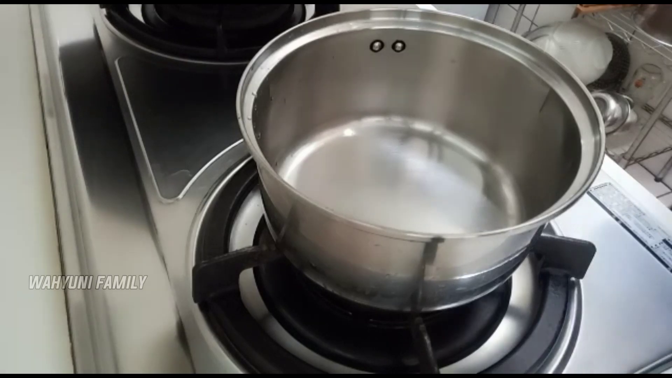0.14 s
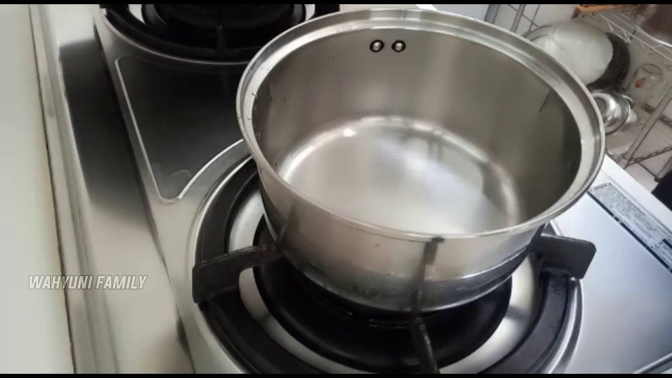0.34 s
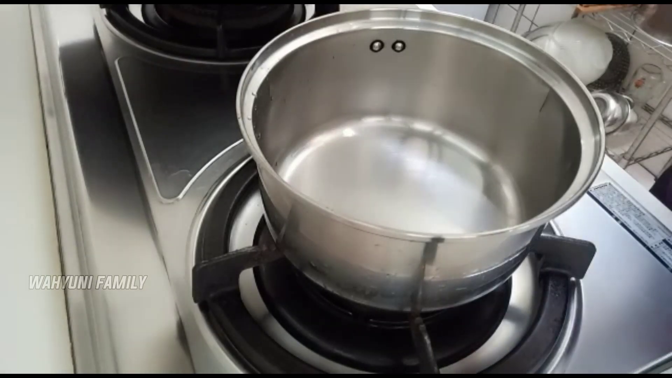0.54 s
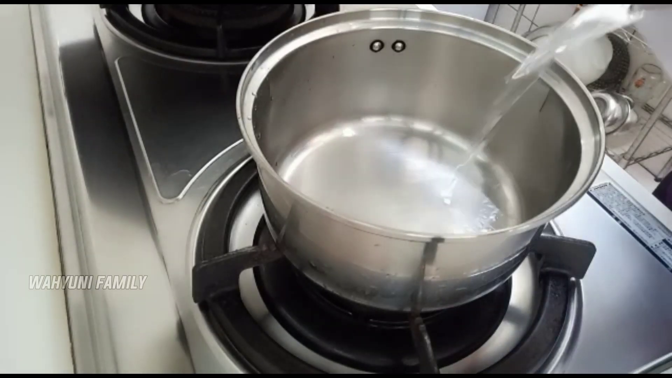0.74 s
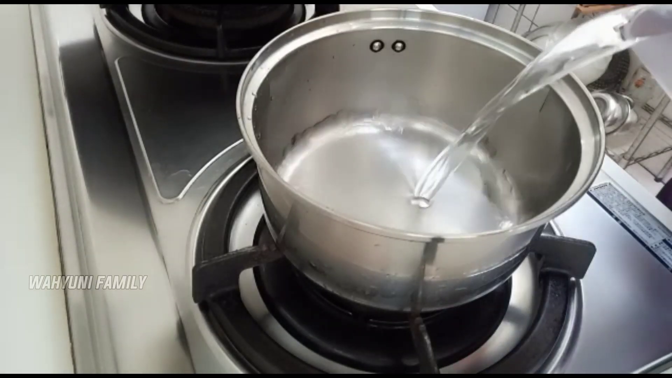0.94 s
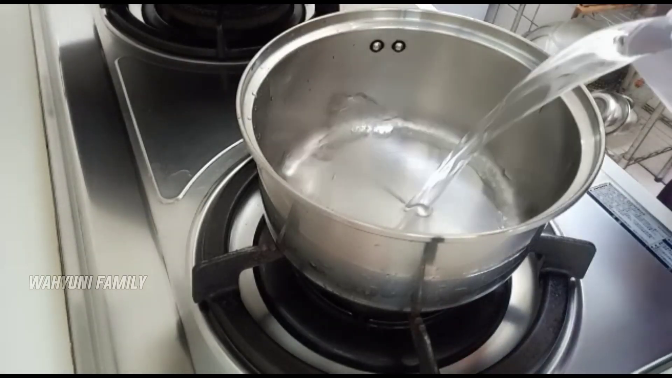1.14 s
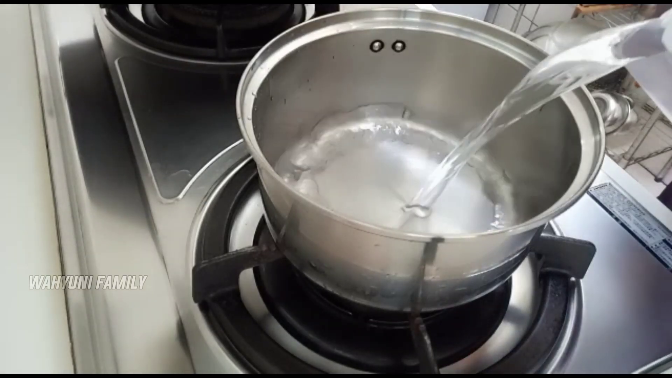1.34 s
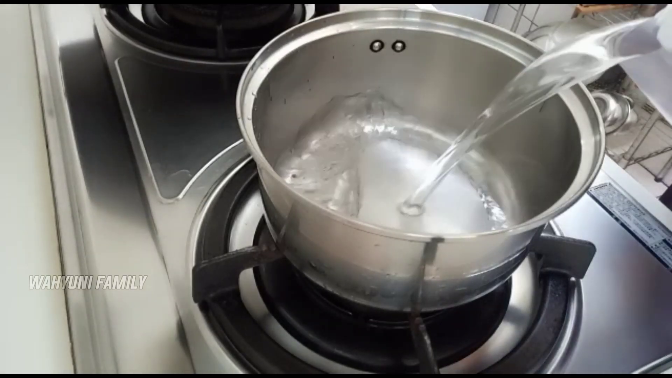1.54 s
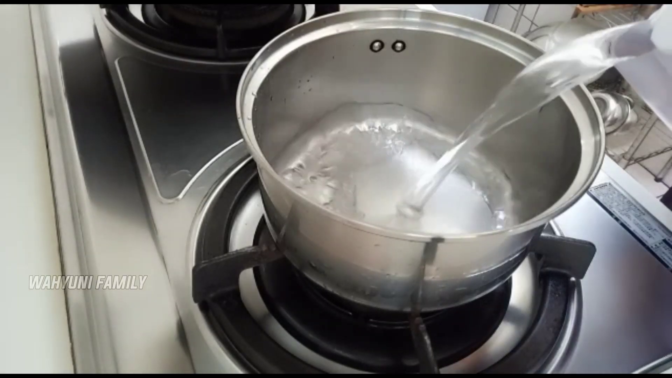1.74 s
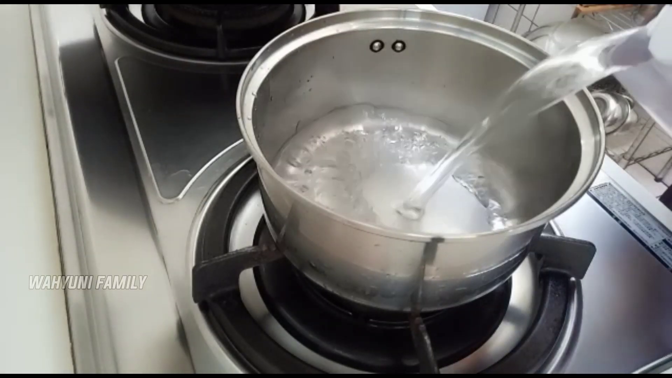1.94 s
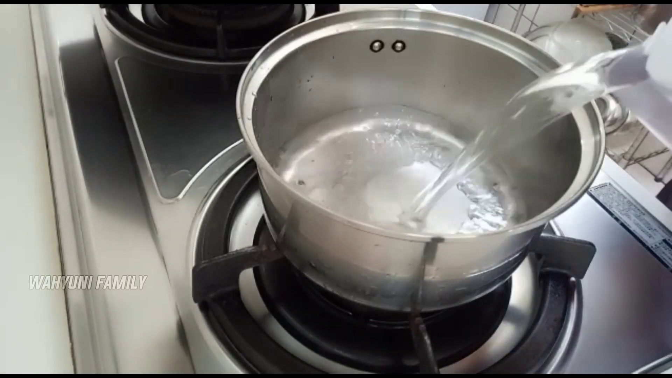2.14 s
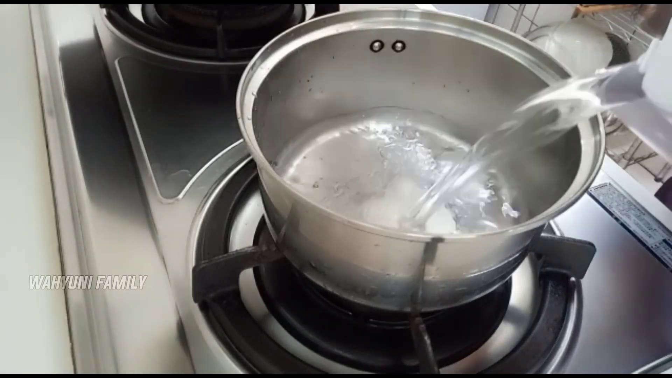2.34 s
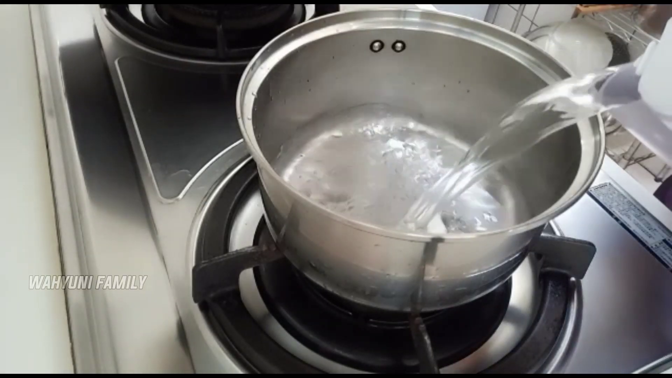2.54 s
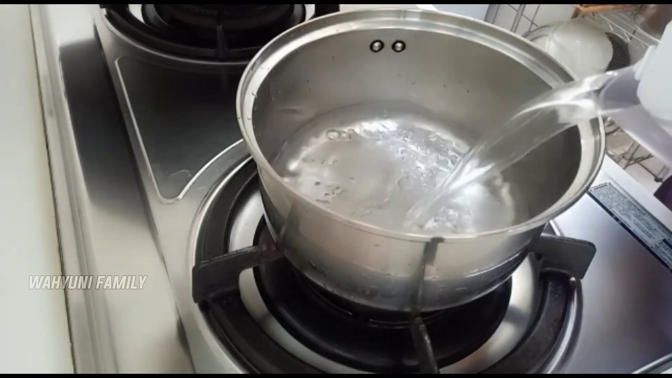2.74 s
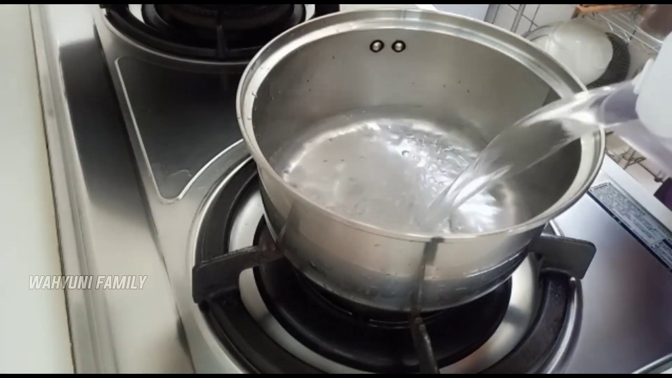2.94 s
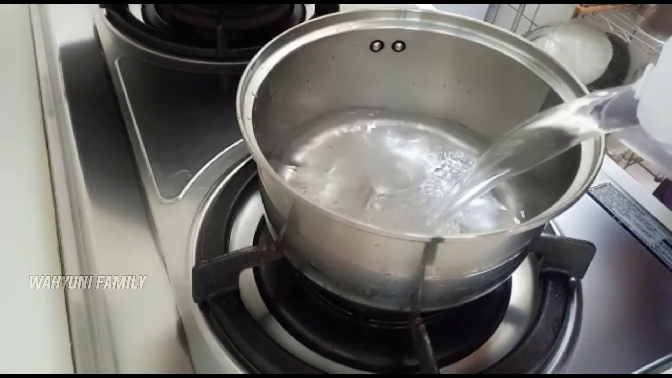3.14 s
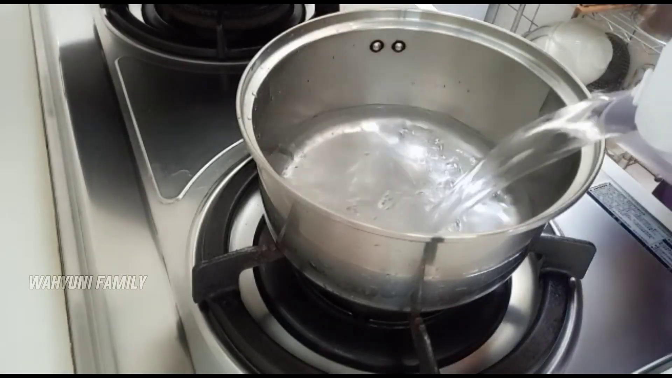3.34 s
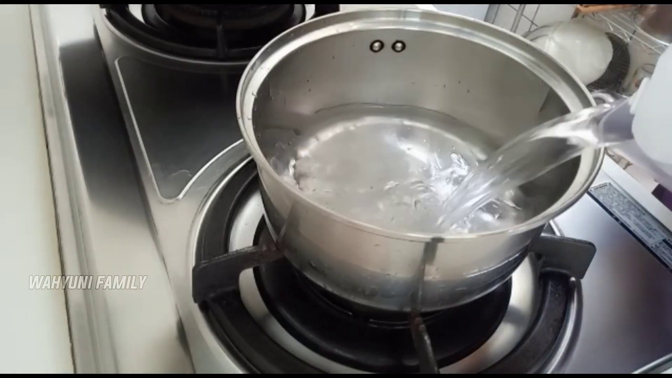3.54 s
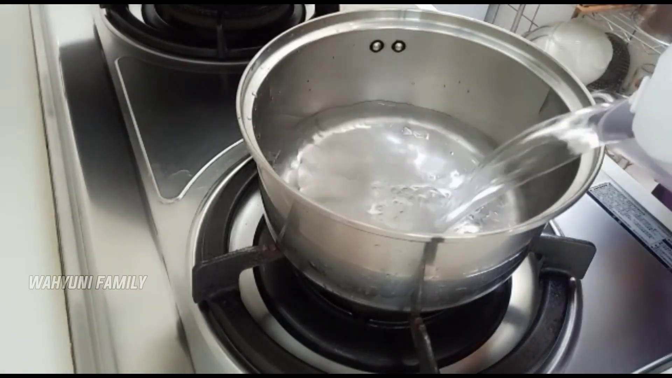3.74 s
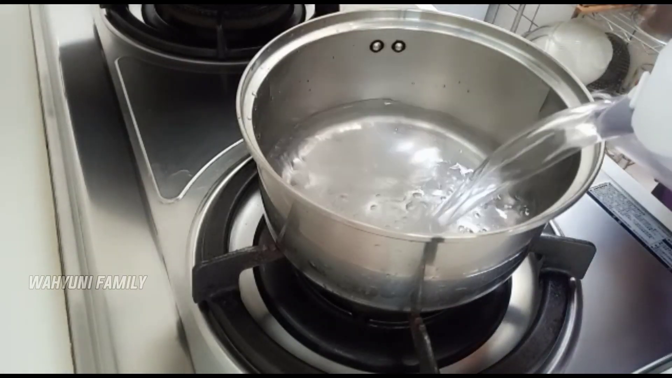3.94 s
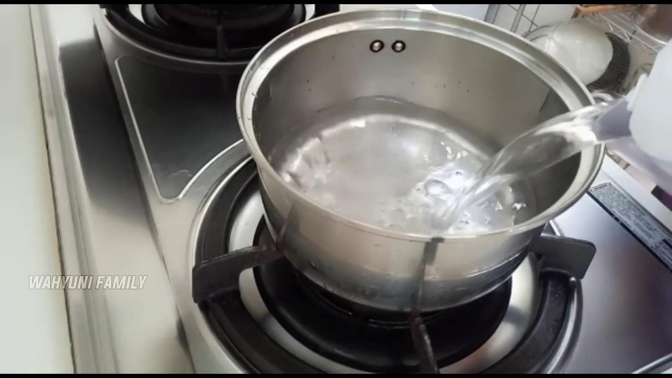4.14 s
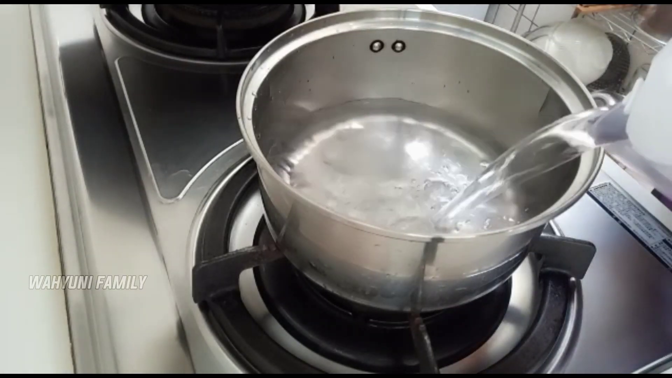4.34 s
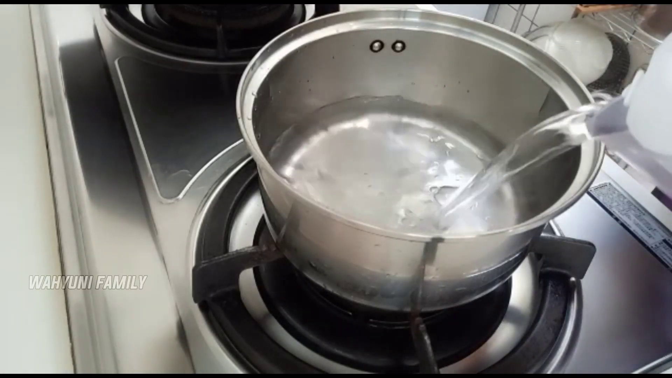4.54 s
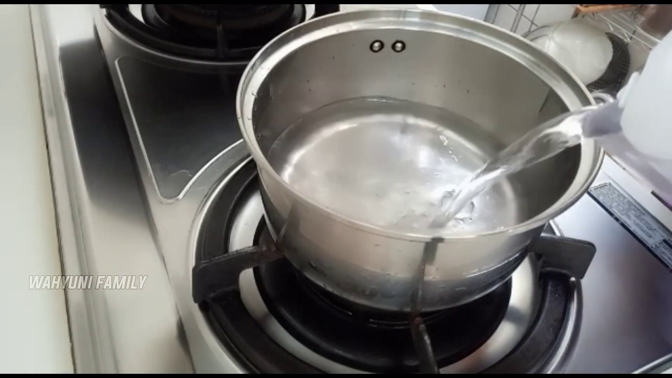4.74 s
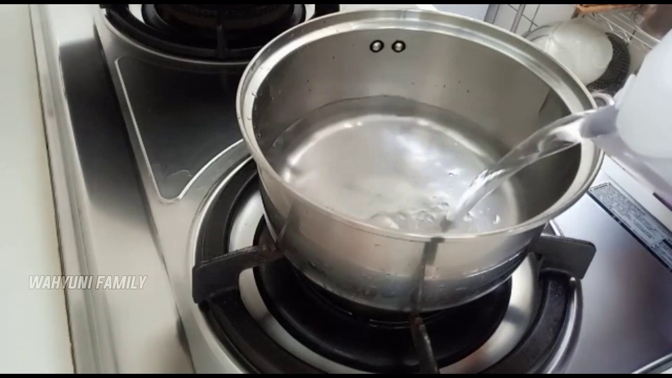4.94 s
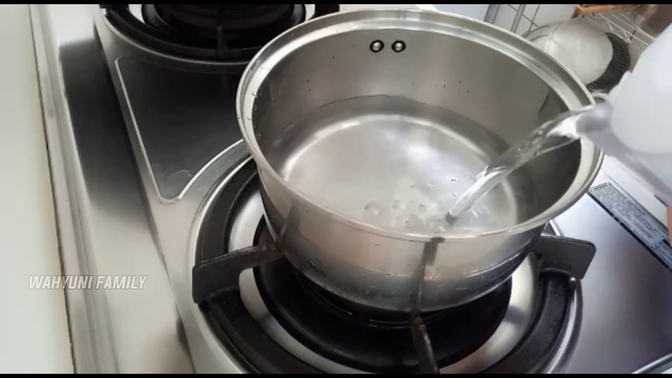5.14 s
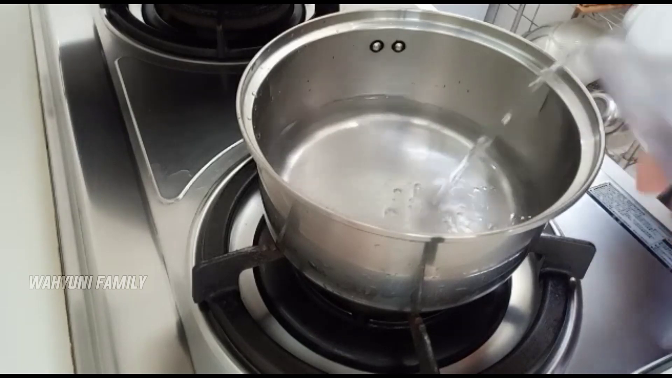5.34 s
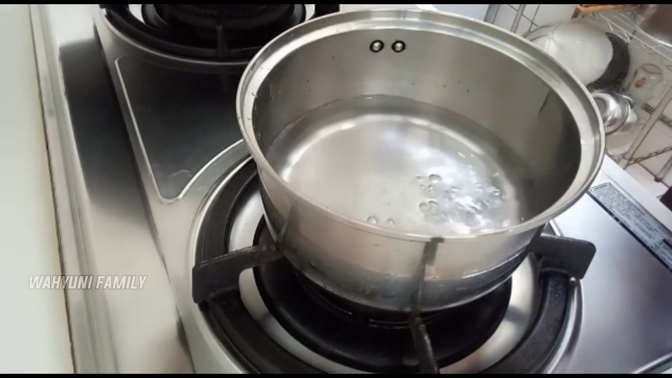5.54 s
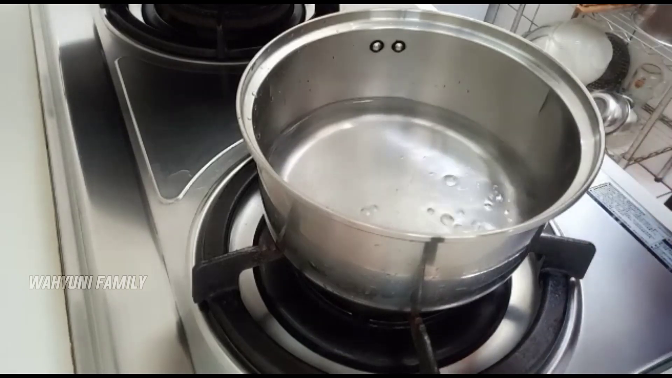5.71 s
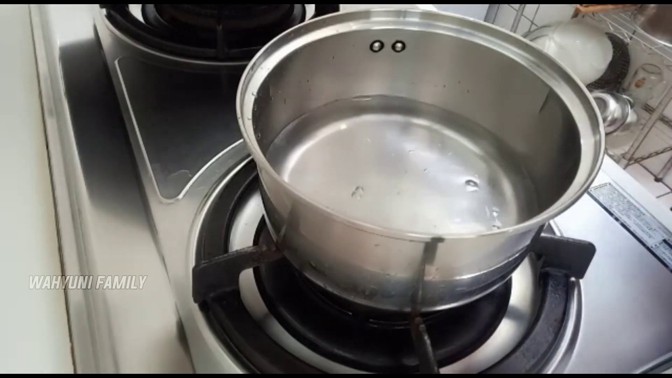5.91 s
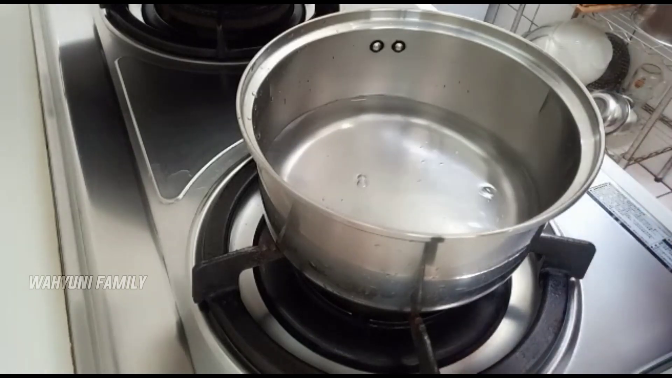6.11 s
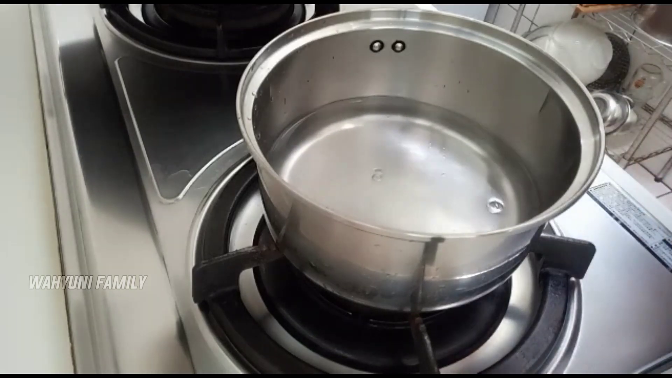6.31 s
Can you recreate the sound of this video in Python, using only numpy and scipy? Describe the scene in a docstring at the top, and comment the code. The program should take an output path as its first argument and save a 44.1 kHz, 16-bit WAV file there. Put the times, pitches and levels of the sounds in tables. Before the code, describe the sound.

Close-up water pour into a steel pot on a stove: nearly silent at first with tiny bumps, then a sharp metallic splatter with snapping drops, loudest early on. The stream thins to a gentle trickling burble over a faint metallic drone, with one brighter splash late. A last gurgle and a jug clack follow, then after a short gap two firm, low thuds rattle the counter in a small tiled kitchen.

```python
"""Water poured from a plastic jug into an empty steel pot on a gas stove spatters on the bare bottom,
then bubbles more softly as the pot fills, and ends in a last gurgle. Ringing air bubbles make the water
sound, bursting drops add snaps and pings, and the air, pot and stove resonate. Faint bumps and a ting come
before; afterwards the jug's decaying modes clack, and two dull knocks ring the counter of a small kitchen."""
import sys
import numpy as np
from scipy import signal
from scipy.fft import rfft, irfft, next_fast_len
from scipy.io import wavfile
from scipy.ndimage import uniform_filter1d

SR = 44100
rng = np.random.default_rng(int(sys.argv[2]) if len(sys.argv) > 2 else 0)


def int16_out(signal):
    """Quantize to a 16-bit WAV file."""
    q = np.round(np.clip(np.atleast_2d(signal).T, -1, 1) * 32767)
    wavfile.write(sys.argv[1], SR, q.astype(np.int16))


N = 285327
TIME = np.arange(N) / SR
SECOND = TIME[:SR]
CUTOFF_HZ = 15800   # nothing is heard above this pitch


def from_db(db):
    """Decibels to amplitude: 20 dB is a factor of ten."""
    return 10 ** (np.asarray(db) / 20)


def rms_one(x):
    """Normalise to unit root-mean-square amplitude."""
    return x / np.sqrt(np.mean(x ** 2) + 1e-20)


def even(x, over_s=0.34):
    """Level by running power: hold rms 1 over the longer run, keeping the fast grain."""
    power = np.abs(uniform_filter1d(x ** 2, int(over_s * SR)))
    return x / np.sqrt(power + 1e-9)


def in_time(rows):
    """Linear interpolation: each column of a curve, sample by sample."""
    s, *columns = np.transpose(rows)
    return [np.interp(TIME, s, column) for column in columns]


def at_hz(points, hz):
    """Interpolation along a logarithmic frequency axis."""
    table_hz, values = np.transpose(points)
    return np.interp(np.log(hz), np.log(table_hz), values)


def drift(rate):
    """Band-limited chance: random points, rate per second, joined by lines; rms 1."""
    return rms_one(np.interp(TIME * rate, np.arange(4096), rng.standard_normal(4096)))


def hump(s, half_length_s):
    """A Gaussian rise and fall around a moment, 1 on top."""
    return np.exp(-((TIME - s) / half_length_s) ** 2)


def add(track, s, sound):
    """Superposition: mix a sound in at a moment."""
    at = int(s * SR)
    track[at:at + len(sound)] += sound[:N - at]


def filtered(x, order, hz, kind="low"):
    """Butterworth filtering: a flat passband between smooth slopes."""
    return signal.sosfilt(signal.butter(order, hz, kind, fs=SR, output="sos"), x + 1e-18)


def resonate(x, hz, width_hz):
    """A two-pole resonance: pole radius sets the width; gain is 1 on top."""
    r = np.exp(-np.pi * width_hz / SR)
    zeros = np.array([1, 0, -1]) * (1 - r * r) / 2
    poles = [1, -2 * r * np.cos(2 * np.pi * hz / SR), r * r]
    return signal.lfilter(zeros, poles, x + 1e-18)


def noise(colour):
    """Spectral shaping: steady noise weighted by a spectrum; rms 1."""
    size = next_fast_len(N)
    hz = np.maximum(np.fft.rfftfreq(size, 1 / SR), 1)
    spectrum = rfft(rng.standard_normal(size)) * from_db(at_hz(colour, hz))
    return rms_one(irfft(spectrum, size)[:N])


def fade(t60):
    """One second of exponential decay, 60 dB down after t60 seconds."""
    return np.exp(-np.log(1000) * SECOND / t60)


def dying_noise(t60s, colour=((1, 0), (SR, 0))):
    """Frequency-dependent damping: noise starts at rms 1 and dies band by band for a second."""
    edges, white = np.geomspace(50, 17000, 18), rng.standard_normal((2, SR))
    centres = np.sqrt(edges[1:] * edges[:-1])
    # neighbouring bands draw on different noise
    bands = np.array([filtered(white[k % 2], 2, edges[k:k + 2], "band") for k in range(len(centres))])
    bands = bands * from_db(at_hz(colour, centres))[:, None]
    dying = bands * fade(at_hz(t60s, centres)[:, None])
    return dying.sum(0) / bands.sum(0).std()


def struck(modes):
    """Modal decay: a second of ringing modes, neighbours swinging in opposite directions."""
    out = np.zeros(SR)
    for k, (hz, db, t60) in enumerate(modes):
        out += (-1) ** k * from_db(db) * fade(t60) * np.sin(2 * np.pi * hz * SECOND)
    return out


def crack(t60):
    """Impulsive contact: noise that dies away exponentially."""
    return rng.standard_normal(SR) * fade(t60)


def bubble(hz, t60, rise):
    """Bubble resonance: it swells within a cycle and rings, its pitch rising as it nears the surface."""
    t = TIME[:int(t60 * SR) + 2]
    envelope = (1 - np.exp(-hz * t)) * np.exp(-np.log(1000) * t / t60)
    return envelope * np.sin(2 * np.pi * hz * t * (1 + rise * t / t60 / 2))


# spectrum of still kitchen air: pitch_hz, level_db (per Hz, relative)
AIR_COLOUR = [(30, 10), (60, -5.5), (130, 4.5), (250, 0), (600, -4), (1000, -6), (2200, -12), (4000, -17),
              (7000, -25), (10000, -24), (15000, -32)]
# level of the air: time_s, level_db
AIR_LEVEL = [(0, -56), (0.6, -55.5), (1.0, -52.5), (5.5, -58.5), (5.94, -57.5), (6.47, -47.5)]


def still_air():
    """Broadband background: shaped noise with a slowly changing level."""
    level_db, = in_time(AIR_LEVEL)
    return from_db(level_db) * noise(AIR_COLOUR)


# bumps on the counter: start_s, level_db, thump pitch_hz, thump level_db, crack level_db
KNOCKS = [(0.244, -49.5, 189, 4.5, -4), (0.413, -52.5, 141, 6, -1), (0.45, -48, 137, 5, -26),
          (5.9477, -15.5, 103.5, -3, -3.5), (6.2996, -18, 187, -14, 0.5)]
# ring of the counter: pitch_hz, level_db, t60_s
COUNTER_MODES = [(131.8, -16.5, 0.93), (160, -4, 0.18), (190, -8.5, 0.62), (246, 3, 0.31), (287, -23, 0.18),
                 (306.7, -5.5, 0.28), (344, -14, 0.55), (408, -11, 0.17), (474, -1, 0.15), (555, -9, 0.13),
                 (683, 0, 0.081), (880, -21, 0.072), (1008, -3, 0.072), (1330, -3, 0.069),
                 (1670, -18, 0.16)]
# the hard base that lands on it, quickly damped: pitch_hz, level_db, t60_s
BASE_MODES = [(228, 7.5, 0.041), (616, 7.5, 0.015), (1420, 5, 0.0037), (1916, -11.5, 0.042),
              (2990, -8.5, 0.013)]
# spectrum of the counter's dense clatter: pitch_hz, level_db (per Hz, relative)
CLATTER = [(40, -36), (70, -16), (120, 11), (250, 2.5), (600, 3.5), (1000, -5.5), (1500, -11), (2300, -24),
           (3200, -17.5), (5000, -36), (15000, -67)]
# decay of the clatter: pitch_hz, t60_s
CLATTER_T60 = [(100, 0.48), (600, 0.46), (2000, 0.36), (10000, 0.16)]
# soft thuds as the base rocks after a knock: start_s, level_db, pitch_hz
ROCKS = [(5.9843, -32, 164), (6.003, -13.5, 274), (6.3095, -13.5, 587), (6.3145, -17, 168),
         (6.3379, -24, 427), (6.352, -18, 260)]
ROCK_T60_S = 0.061


def knocks(ring_db=-4.0, clatter_db=-6.5, contact_hz=1800, thump_t60=0.21, jolt_db=2.5,
           press_s=0.0056, rock_press_s=0.0018):
    """Impact excitation: each blow cracks, thumps and rings the counter's modes; the base rocks to rest."""
    out = np.zeros(N)
    press = 1 - np.exp(-SECOND / press_s)   # the force builds up as the base seats itself
    for s, db, thump_hz, thump_db, crack_db in KNOCKS:
        snap = filtered(crack(0.014), 1, contact_hz)
        contact = snap + from_db(jolt_db) * struck(BASE_MODES)
        body = from_db(ring_db) * struck(COUNTER_MODES) + struck([(thump_hz, thump_db, thump_t60)])
        clatter = from_db(clatter_db) * dying_noise(CLATTER_T60, CLATTER)
        add(out, s, from_db(db) * (press * (body + clatter) + from_db(crack_db) * contact))
    for s, db, hz in ROCKS:
        add(out, s, struck([(hz, db, ROCK_T60_S)]) * (1 - np.exp(-SECOND / rock_press_s)))
    return out


# strength of the stream where it lands: time_s, level_db
FLOW = [(0.7, -53), (0.78, -49.5), (0.9, -38.5), (0.96, -45.5), (1.05, -39.5), (1.2, -41), (1.35, -37),
        (1.6, -35), (2.19, -37.5), (2.5, -40), (2.64, -41.5), (3.37, -46.5), (3.81, -44.5), (4.0, -49.5),
        (4.95, -54.5), (5.2, -53), (5.44, -52.5), (5.55, -56.5)]
# resonances of pot and stove that hum from before the pour to its end: pitch_hz, width_hz (half that of each
# stage), level_db
STOVE = [(130.54, 3.4, 7.5), (161, 54, -12.5), (234, 41, -19.5), (360, 200, -26.5), (440.3, 15, -13)]
# ring of the steel bottom, sinking under the water's load: time_s, pitch_hz, level_db
BOTTOM = [(0.75, 885, -78), (1.098, 871, -57), (1.449, 856, -81), (1.85, 831, -52), (2.2, 783, -50),
          (2.449, 735, -60), (2.999, 698, -68), (3.5, 676, -69.5), (5.501, 598, -66.5)]
# the tail of the stream drops in as one slug: when, how long either side, how much harder
SLUG_S, SLUG_HALF_S, SLUG_DB = 5.15, 0.15, 9
DRONE_LAG_S, DRONE_STRETCH = 0.06, 1.23   # the heavy stove answers the slug later and for longer


def humming(drone_db=-59.0, flow_share=0.11, slug_share=1.57, ring_width_hz=30):
    """Forced resonance: pot and stove drone, louder under strong flow and the slug; the bottom rings along."""
    flow_db, = in_time(FLOW)
    slug_db = SLUG_DB * hump(SLUG_S + DRONE_LAG_S, DRONE_STRETCH * SLUG_HALF_S)
    drum_db = drone_db + flow_share * (flow_db - flow_db.mean()) + slug_share * slug_db
    push, body = rng.standard_normal(N), np.zeros(N)
    for hz, width, db in STOVE:
        body += from_db(db) * resonate(resonate(push, hz, 2 * width), hz, 2 * width)
    touched = np.interp(TIME, [.3, .45, 5.45, 5.7], [0, 1, 1, 0])
    hz, ring_db = in_time(BOTTOM)
    phase = 2 * np.pi * np.cumsum(hz) / SR
    # chance on both quadratures widens the tone into a narrow band
    bottom = rms_one(drift(2 * ring_width_hz) * np.sin(phase) + drift(2 * ring_width_hz) * np.cos(phase))
    return from_db(drum_db) * even(body) * touched + from_db(ring_db) * bottom


# modes of the light ting before the pour: pitch_hz, level_db, t60_s
TOUCH_MODES = [(454, -8, 0.4), (1807, 5, 0.25), (3040, 8, 0.048), (4360, -3, 0.077)]
TOUCH_S, TOUCH_DB = 0.407, -43
# the jug's clack and rebound: start_s, level_db
CLACKS = [(5.314, -17), (5.3208, -25)]
# ring of the jug: pitch_hz, level_db, t60_s
JUG_MODES = [(440, -21.5, 0.075), (745, -23, 0.11), (1290, -11, 0.056), (1520, 0.5, 0.023), (1703, 4, 0.03),
             (2700, -10.5, 0.012), (3830, -9, 0.0078)]
# spectrum of the hollow rattle of the jug's wall: pitch_hz, level_db (per Hz, relative)
JUG_RATTLE = [(150, -14), (500, -8), (1000, -11.5), (1350, -2), (1700, 2), (2050, -19), (4000, -27),
              (7000, -25.5), (15000, -36)]


def handling(clack_crack_db=-8.5, touch_swell_s=0.019, rattle_db=-35.0, rattle_t60=0.43):
    """Modal ringing: a light ting before the pour, a hollow plastic clack after it."""
    out = np.zeros(N)
    tick = filtered(crack(0.17), 2, 9000)
    ting = struck(TOUCH_MODES) * (1 - np.exp(-SECOND / touch_swell_s))
    add(out, TOUCH_S, from_db(TOUCH_DB) * (ting + tick))
    for s, db in CLACKS:
        snap = filtered(crack(0.056), 3, 4200)
        add(out, s, from_db(db) * (struck(JUG_MODES) + from_db(clack_crack_db) * snap))
    add(out, CLACKS[0][0], from_db(rattle_db) * noise(JUG_RATTLE)[:SR] * fade(rattle_t60))
    return out


# air resonances inside the pot: pitch_hz, width_hz, level_db
POT_AIR = [(449, 19, 14), (642, 26, 4), (732, 30, 5), (1043, 46, 2), (1185, 28, 4), (1290, 44, 7),
           (1580, 17, -34), (2030, 66, 5), (2406, 73, 8.5), (2670, 41, 10), (3257, 220, 6),
           (4146, 180, 3.5), (5100, 250, -3.5), (6600, 98, -3)]


def in_pot(x, wall_db=-2.0, wall_t60=0.022):
    """Cavity acoustics: sound bounces between steel walls and stirs the pot's air resonances."""
    bounces = crack(wall_t60) * (SECOND > .0012)   # the first bounce takes over a millisecond
    walls = signal.fftconvolve(x, bounces / np.linalg.norm(bounces))[:N]
    air = sum(from_db(db) * resonate(x, hz, width) for hz, width, db in POT_AIR)
    return x + from_db(wall_db) * walls + air


# when the stream sets in and ends; its onset ramp and its decay time constant
POUR_START_S, POUR_END_S, START_S, SETTLE_S = 0.732, 5.29, 0.016, 0.24
COVER_S = 0.283   # time constant for a layer of water to spread over the bare bottom


def bareness(s):
    """Exponential relaxation: 1 until the stream sets in, towards 0 as water covers the bottom."""
    return np.exp(-np.maximum(s - POUR_START_S, 0) / COVER_S)


# the hardest drops that smack on the steel: start_s, level_db, ping pitch_hz, splatter level_db
SMACKS = [(0.573, -38.5, 9800, -5.5), (0.7237, -32.5, 9500, 3), (0.8115, -26, 9600, 2),
          (0.9008, -19.5, 8970, -1.5), (0.938, -18, 7460, -16), (0.9649, -12, 6600, -20),
          (0.9922, -14.5, 10150, -10), (1.0059, -21.5, 9500, -8), (1.087, -18.5, 12800, -13),
          (1.1942, -18, 9250, -10), (1.1436, -15, 8920, -1.5), (1.2107, -21, 8160, -2),
          (1.2875, -7.5, 8500, -17), (1.3753, -15.5, 8360, -1.5), (1.4387, -13, 9430, 0),
          (1.508, -31, 9000, -10), (1.529, -17.5, 9030, -0.5), (1.5587, -14.5, 10100, -8),
          (1.6205, -13.5, 8400, -10), (1.679, -12.5, 9300, -4.5), (1.724, -19, 8600, -5),
          (1.7735, -9, 9000, -12.5), (1.871, -26, 9500, 0), (1.905, -12.5, 9600, -7.5),
          (1.9275, -16, 7400, -11), (2.0085, -10, 9700, -13.5), (2.046, -17, 9030, -3),
          (2.076, -22.5, 8970, -2), (2.153, -31, 8200, -7), (2.2842, -18.5, 9200, -4),
          (2.402, -14, 8600, -6), (2.8575, -25, 10160, 0.5), (2.9453, -25, 9300, -13),
          (3.0615, -43, 8700, -13), (3.17, -22.5, 8300, -6), (3.295, -28, 8500, 2), (3.3883, -25, 9050, -4),
          (3.5926, -26.5, 9350, -1), (3.7157, -27.5, 9700, -1), (4.2697, -12.5, 7700, -6.5),
          (4.476, -30, 9300, -8), (4.5655, -33, 10700, 1.5), (4.72, -38.5, 10500, 2.5),
          (4.9577, -36, 9400, -1), (5.0024, -33.5, 8940, 0), (5.0585, -29, 7800, -0.5),
          (5.1135, -21.5, 9300, -3.5), (5.1627, -19, 10000, -11)]
SNAP_T60_S = 0.0028   # a drop's first snap


def smacks(level_db=-5.5, sizzle_db=-11.0, scatter_db=-2.5, scatter_s=0.021, bare_sizzle_s=0.059,
           low_hz=3700, top_over_ping=1.3, count=12):
    """Drop impact: a snap and a tiny ping, a sizzle, then scattered droplets, the later the fainter."""
    out = np.zeros(N)
    for s, db, ping_hz, splatter_db in SMACKS:
        size = from_db(db + level_db)
        splatter = size * from_db(splatter_db)
        sizzle = from_db(sizzle_db) * crack(0.043 + bare_sizzle_s * bareness(s))
        burst = size * crack(SNAP_T60_S) + splatter * sizzle
        top_hz = min(top_over_ping * ping_hz, CUTOFF_HZ)
        add(out, s, filtered(burst, 3, [low_hz, top_hz], "band"))
        add(out, s, size * bubble(ping_hz, 0.0023, 0.021))
        for late, spread in zip(rng.exponential(1, count), rng.uniform(-0.64, 1, count)):
            droplet = bubble(ping_hz * np.exp(0.1 * spread), 0.006, 0.05)
            add(out, s + late * scatter_s, splatter * from_db(scatter_db) * np.exp(-late / 2) * droplet)
    return in_pot(out, wall_db=-4.0)


# single bubbles that stand out, big and small: start_s, level_db, pitch_hz
PLOPS = [(0.607, -45, 5670), (0.638, -49, 6400), (0.71, -41, 4740), (0.726, -39, 3400), (0.76, -44, 5200),
         (0.8, -32, 3560), (0.827, -30, 4460), (0.869, -33, 5450), (0.88, -26.5, 3040), (0.961, -28, 1954),
         (1.018, -30.5, 1410), (1.084, -30, 670), (1.212, -28, 1336), (1.372, -20.5, 3670),
         (1.248, -11.5, 2770), (1.287, -16, 1297), (1.296, -18, 1470), (1.437, -12, 4820),
         (1.465, -28, 990), (1.492, -25, 1960), (1.529, -27, 728), (1.552, -25, 778), (1.583, -23, 4000),
         (1.592, -25, 834), (1.695, -17, 5180), (1.754, -19.5, 1380), (1.757, -17, 1960), (1.805, -36, 474),
         (1.888, -25.5, 755), (1.936, -29, 936), (1.981, -28, 1212), (2.095, -19.5, 1350),
         (2.207, -17.5, 2470), (2.401, -19.5, 1295), (2.63, -22, 2547), (3.014, -30, 1230),
         (3.03, -24.5, 6680), (3.052, -37, 1280), (3.06, -25.5, 5600), (3.457, -44, 658),
         (3.482, -32, 1480), (3.615, -23.5, 6330), (3.921, -24, 3310), (3.765, -31, 970),
         (3.83, -34.5, 910), (3.93, -36, 807), (3.965, -29, 786), (4.172, -30.5, 3160), (4.628, -32, 5000),
         (4.762, -31, 6860), (4.77, -28.5, 6520), (4.853, -39, 3600), (5.06, -35.5, 3400),
         (5.025, -35, 930), (5.061, -33, 855), (5.118, -33, 950), (5.131, -33.5, 1900), (5.152, -35.5, 445),
         (5.153, -23, 860), (5.157, -30, 2175), (5.172, -30.5, 705), (5.193, -21, 794), (5.22, -36, 3820)]
PLOP_T60_S, PLOP_T60_SLOPE = 0.045, 0.61   # ring of a 1 kHz bubble; power of size that lengthens it


def plops(level_db=-5.5, rise=0.19):
    """Size scaling: of the bubbles that stand out, big ones ring longest and glide up the most."""
    out = np.zeros(N)
    for s, db, hz in PLOPS:
        size = 1000 / hz   # pitch is inverse to size
        ring = bubble(hz, PLOP_T60_S * size ** PLOP_T60_SLOPE, rise * size ** 0.76)
        add(out, s, from_db(db + level_db) * ring)
    return in_pot(out)


LUMPS_PER_S, LUMP_S, STEADY_SHARE = 140, 0.0045, 0.3   # lump decay time; steady churn, share of a lump


def surges():
    """Shot noise: the stream lands in uneven lumps, each a rush of bubbles that dies away."""
    lumps = (rng.random(N) < LUMPS_PER_S / SR) * rng.exponential(1, N)
    return STEADY_SHARE + signal.lfilter([1], [1, -np.exp(-1 / (LUMP_S * SR))], lumps)


# bubble loudness by pitch: pitch_hz, level_db
BUBBLE_SIZES = [(400, -26.5), (700, -11), (1000, -15), (1300, 4), (2000, 2.5), (3000, 6), (4200, 5),
                (6500, 5), (6900, 4), (7800, 8), (9000, 10), (11500, 4), (15500, 13)]
# level of the sharpest spatter as the water deepens: time_s, level_db
CUSHION = [(0.7, 0), (1.8, 0.5), (2.6, -7.5), (3.6, -1), (4.25, 5.5), (4.7, -7), (5.0, 0)]


def swarm(low_hz, high_hz, cycles, spread_db, clumps, count, rise=0.12, rush_db=-6.0):
    """Statistical superposition: bubbles of one size class, born in clumps over a faint rush, in the pot."""
    out, chance = np.zeros(N), rng.random((count, 5))
    born = np.interp(chance[:, 0], np.cumsum(clumps) / clumps.sum(), TIME)
    pitches = low_hz * (high_hz / low_hz) ** chance[:, 1]
    sharpness = np.interp(pitches, [10000, 12500], [0, 1])
    cushion_db = np.interp(born, *np.transpose(CUSHION)) * sharpness
    luck = np.minimum(-np.log(chance[:, 2]), 3)   # few bubbles are much louder than the rest
    sizes = from_db(at_hz(BUBBLE_SIZES, pitches) + cushion_db + spread_db * luck)
    sizes = sizes * rng.choice([-1, 1], count)
    dampings, lifts = .5 + chance[:, 3], 2 * chance[:, 4]
    for s, hz, size, damping, lift in zip(born, pitches, sizes, dampings, lifts):
        add(out, s, size * bubble(hz, cycles / hz / damping, rise * lift))
    hiss = rng.standard_normal(N) * np.sqrt(clumps)
    rush = rms_one(filtered(hiss, 3, [low_hz, min(high_hz, 10500)], "band"))
    return even(in_pot(rms_one(out) + from_db(rush_db) * rush))


def pouring(level_db, follows, bare_db, slug_share):
    """Source strength: gain follows the flow, differs on the bare bottom and swells with the slug."""
    flow_db, = in_time(FLOW)
    onset = np.clip((TIME - POUR_START_S) / START_S + 1, 0, 1)
    settling = np.exp(-np.maximum(TIME - POUR_END_S, 0) / SETTLE_S)
    flow_part_db = follows * (flow_db - flow_db.max())
    slug_db = slug_share * SLUG_DB * hump(SLUG_S, SLUG_HALF_S)
    return onset * settling * from_db(level_db + flow_part_db + bare_db * bareness(TIME) + slug_db)


SWARM_SPREAD_DB, SPARKLE_SPREAD_DB = 3.9, 3.5   # how unequal the bubbles are


def stream():
    """Air entrainment: big bubbles gurgle, small ones splash, droplets spray, lone tiny bubbles sparkle."""
    shared = surges()
    gurgle = swarm(503.4, 2020, cycles=49, spread_db=SWARM_SPREAD_DB, clumps=shared + surges(),
                   count=4200, rise=0.11, rush_db=-8.0)
    splash = swarm(2009, 6460, cycles=43.5, spread_db=SWARM_SPREAD_DB, clumps=shared + surges(),
                   count=6500, rise=0.091, rush_db=-8.0)
    spray = swarm(6650, 16200, cycles=35, spread_db=SWARM_SPREAD_DB, clumps=shared + surges(),
                  count=5500, rise=0.1, rush_db=-6.0)
    sparkle = swarm(5120, 11790, cycles=115, spread_db=SPARKLE_SPREAD_DB, clumps=shared,
                    count=700, rise=0.07, rush_db=-21)
    sparkle = sparkle * np.clip((POUR_END_S - TIME) / START_S, 0, 1)   # only while the stream runs
    return (gurgle * pouring(level_db=-41.0, follows=1.0, bare_db=-12.0, slug_share=1.1)
            + splash * pouring(level_db=-38.5, follows=1.0, bare_db=-6.0, slug_share=0.7)
            + spray * pouring(level_db=-41.5, follows=1.107, bare_db=4.0, slug_share=0.98)
            + sparkle * pouring(level_db=-44.5, follows=1.0, bare_db=6.0, slug_share=0.1))


# slaps of water that set the steel bottom singing: start_s, level_db
SLAPS = [(1.108, -42), (1.29, -43.5), (1.394, -39), (1.53, -37), (1.75, -33)]


def singing(t60=0.54):
    """Mass loading: each slap rings the bottom at the pitch that its load of water allows."""
    out = np.zeros(N)
    times, pitches, _ = np.transpose(BOTTOM)
    for s, db in SLAPS:
        add(out, s, struck([(np.interp(s, times, pitches), db, t60)]))
    return out


# gulps that drag down clouds of like-sized bubbles:
# centre_s, half_length_s, level_db, pitch_hz, pitch spread_octaves
GULPS = [(1.298, 0.018, -26.5, 1534, 0.23), (1.77, 0.016, -29, 1684, 0.246),
         (2.002, 0.19, -37.5, 1673, 0.43), (2.417, 0.012, -36, 1350, 0.35),
         (2.603, 0.26, -43.5, 2730, 0.24), (2.671, 0.06, -41.5, 1510, 0.46),
         (3.032, 0.026, -52, 1504, 0.58), (3.142, 0.18, -49, 1267, 0.03), (3.473, 0.06, -47, 982, 0.52),
         (3.789, 0.08, -45, 1060, 0.51), (3.967, 0.035, -43, 793, 0.065), (4.559, 0.047, -52, 1160, 0.17),
         (5.148, 0.029, -47.5, 2300, 0.4), (5.07, 0.05, -50.5, 760, 0.39), (5.178, 0.046, -42, 729, 0.39)]


def gulps(level_db=-7.5, size_spread_db=3.5, cycles=44, rise=0.058, count=180):
    """Bubble clouds: each gulp is a burble of bubbles scattered around one moment and one pitch."""
    out = np.zeros(N)
    for s, half_length_s, db, hz, octaves in GULPS:
        size = from_db(db + level_db) * np.sqrt(half_length_s * hz / count)
        for when, high, big in np.clip(rng.standard_normal((count, 3)), -2, 2):
            pitch = hz * 2 ** (octaves * high)
            loudness = size * from_db(size_spread_db * big)
            add(out, s + half_length_s * when / np.sqrt(2), loudness * bubble(pitch, cycles / pitch, rise))
    return in_pot(out)


# a thin hiss after each of the two late knocks: peak_s, level_db, swell_s, fade_s
HISS = [(6.2, -48, 0.11, 0.085), (6.447, -43, 0.042, 0.024)]
# spectrum of the hiss: pitch_hz, level_db (per Hz, relative)
HISS_COLOUR = [(500, -6), (2500, -5.5), (4500, -5), (6000, -6.5), (8000, -5.5), (11500, -3), (15000, -2)]


def thin_hiss():
    """Amplitude modulation: shaped noise swells and fades along lopsided Gaussian humps."""
    swells = np.zeros(N)
    for s, db, swell_s, fade_s in HISS:
        swells += from_db(db) * hump(s, np.where(TIME < s, swell_s, fade_s))
    return swells * noise(HISS_COLOUR)


# reverberation of the kitchen: pitch_hz, t60_s
KITCHEN_T60 = [(150, 0.69), (1500, 0.31), (5000, 0.28), (14000, 0.41)]


def kitchen(x):
    """Diffuse reverberation: the tiled walls answer with a tail that dies band by band."""
    tail = dying_noise(KITCHEN_T60) * np.clip(SECOND / 0.007, 0, 1)
    return signal.fftconvolve(x, tail / np.linalg.norm(tail))[:N]


def scene(water_room_db=-8.0, knock_room_db=-13.5, jug_room_db=-21):
    """Direct and reverberant sound: water, jug and counter in the room over still air; the jug nearly dry."""
    water, jug, counter = stream() + gulps() + plops() + smacks(), handling(), knocks()
    sent = from_db(water_room_db) * water + from_db(jug_room_db) * jug + from_db(knock_room_db) * counter
    direct = water + humming() + singing() + jug + counter
    return (direct + kitchen(sent) + still_air() + thin_hiss())[None]


def record(dry, port_hz=9300, port_width_hz=1100, port_db=4.5, low_cut_hz=70):
    """Transducer response: the microphone port rings in the treble; deep bass and the very top are cut."""
    x = dry + from_db(port_db) * resonate(dry, port_hz, port_width_hz)
    x = filtered(x, 3, low_cut_hz, "high")
    return signal.sosfilt(signal.ellip(10, .2, 70, CUTOFF_HZ, fs=SR, output="sos"), x)


dry = scene()
out = record(dry)
int16_out(out)
```